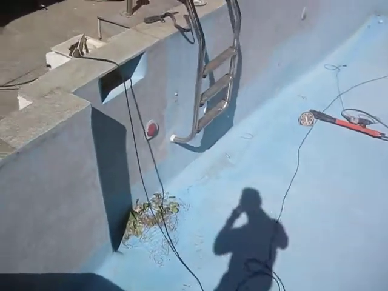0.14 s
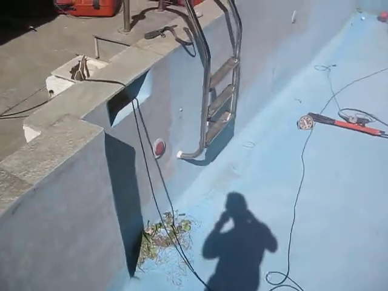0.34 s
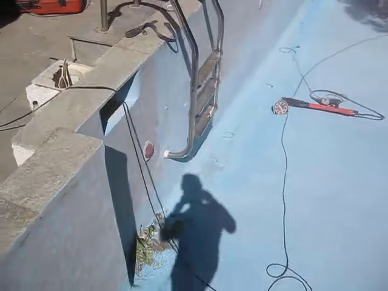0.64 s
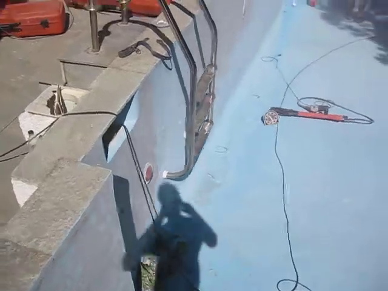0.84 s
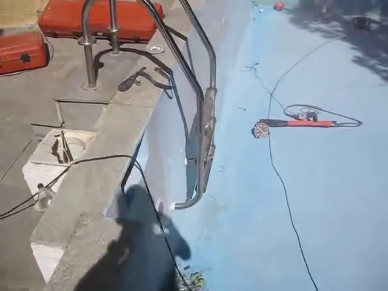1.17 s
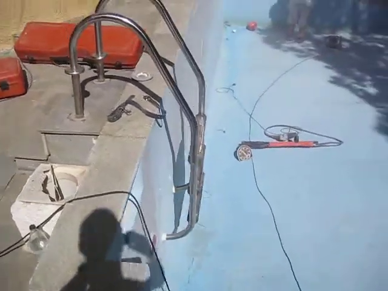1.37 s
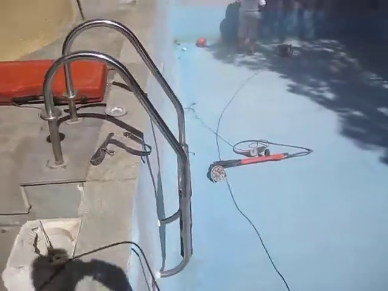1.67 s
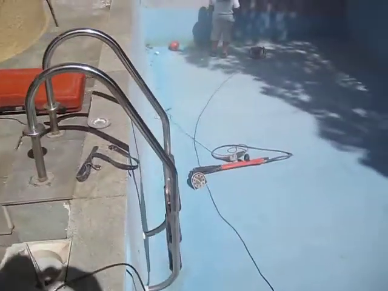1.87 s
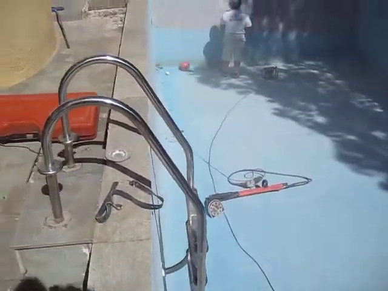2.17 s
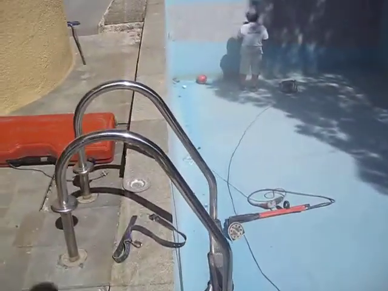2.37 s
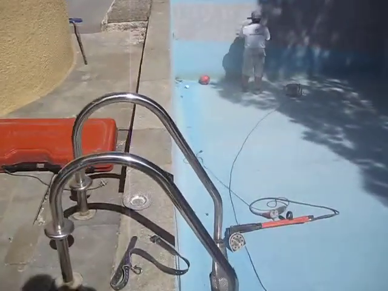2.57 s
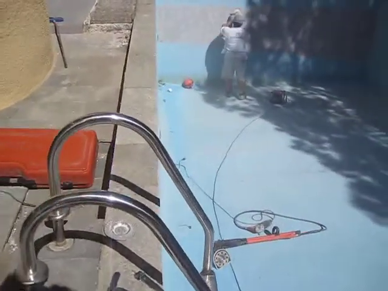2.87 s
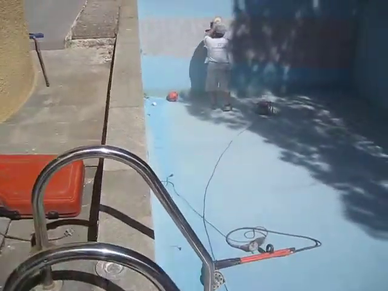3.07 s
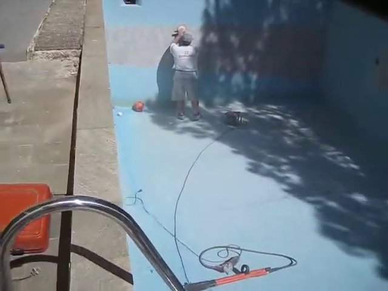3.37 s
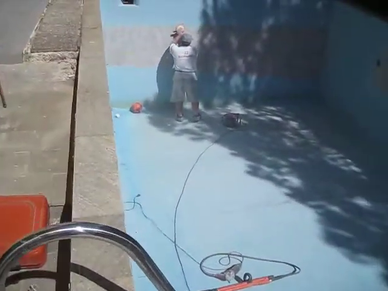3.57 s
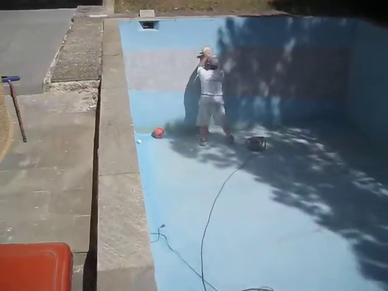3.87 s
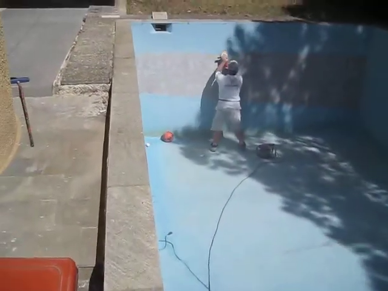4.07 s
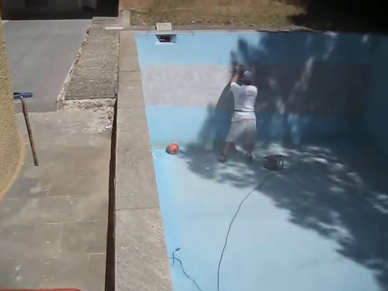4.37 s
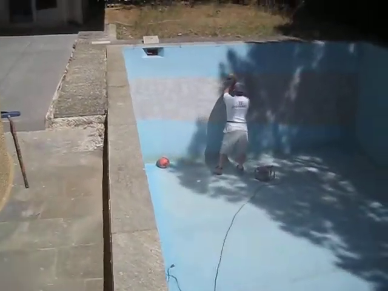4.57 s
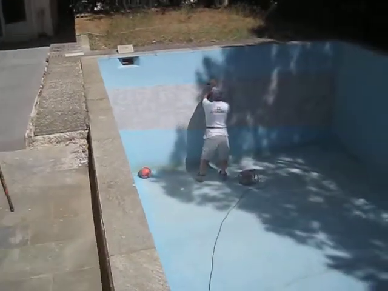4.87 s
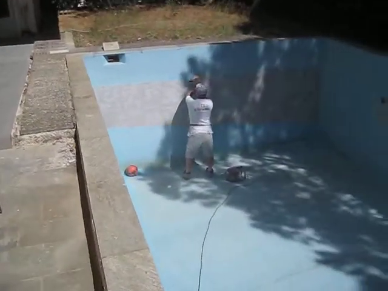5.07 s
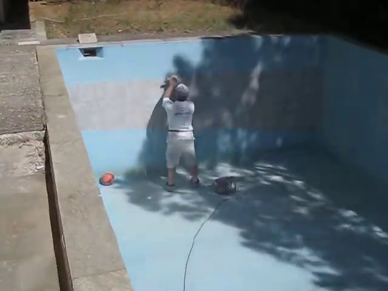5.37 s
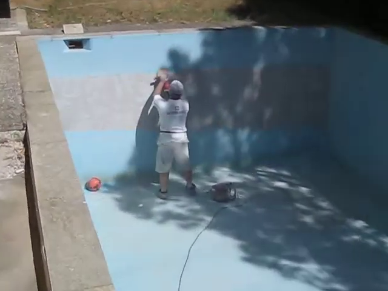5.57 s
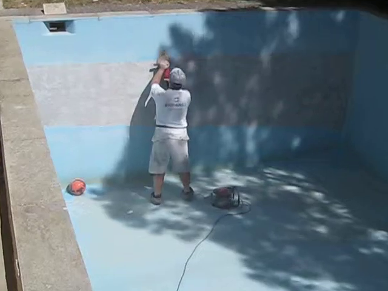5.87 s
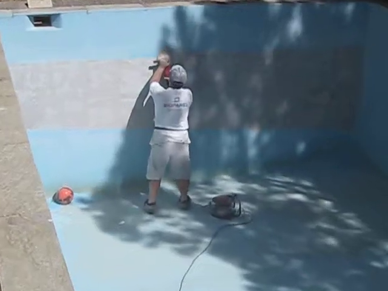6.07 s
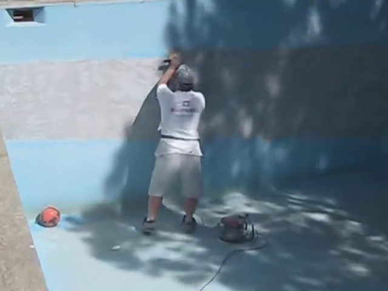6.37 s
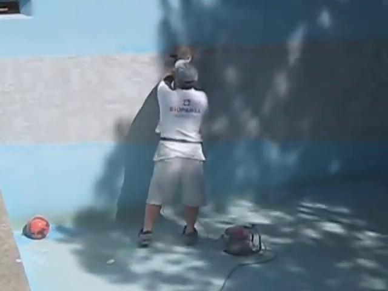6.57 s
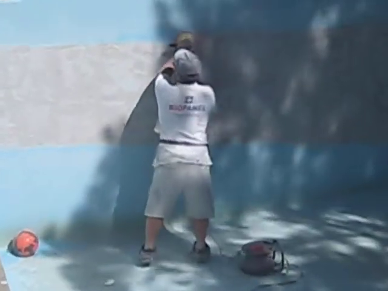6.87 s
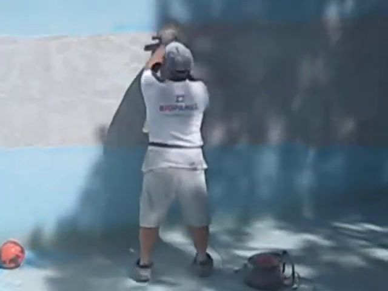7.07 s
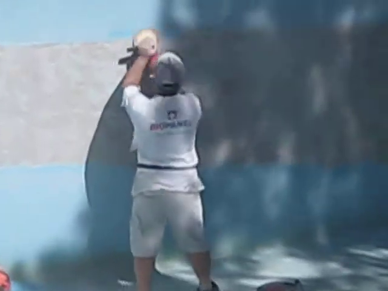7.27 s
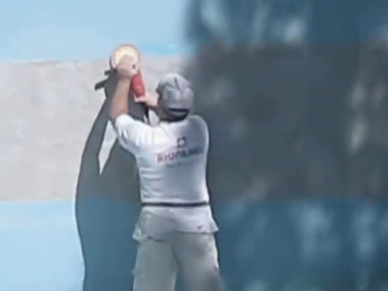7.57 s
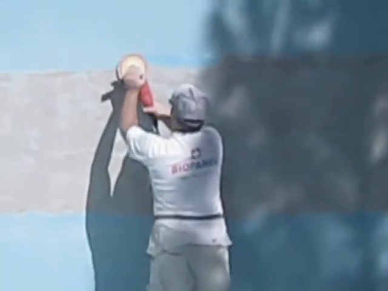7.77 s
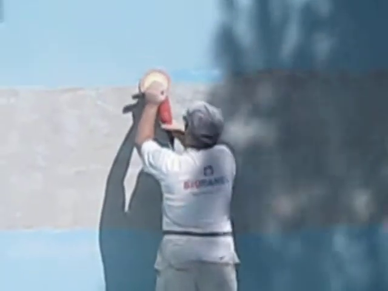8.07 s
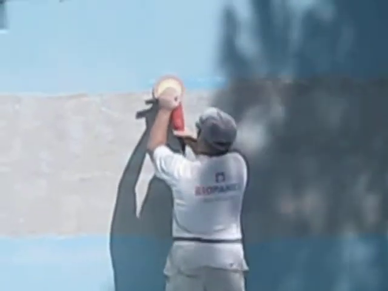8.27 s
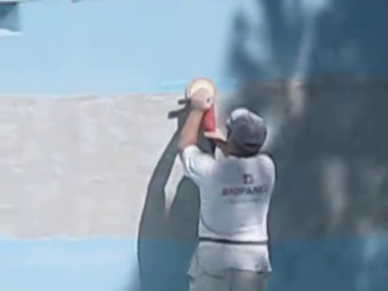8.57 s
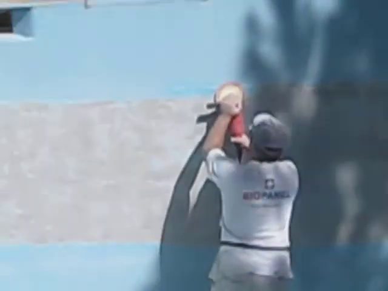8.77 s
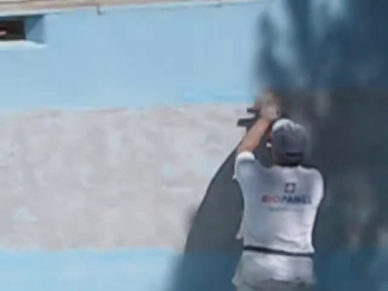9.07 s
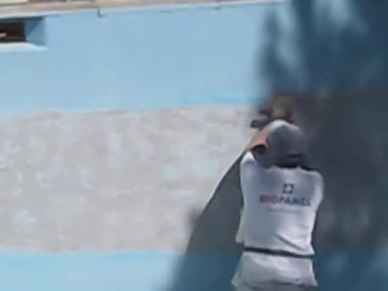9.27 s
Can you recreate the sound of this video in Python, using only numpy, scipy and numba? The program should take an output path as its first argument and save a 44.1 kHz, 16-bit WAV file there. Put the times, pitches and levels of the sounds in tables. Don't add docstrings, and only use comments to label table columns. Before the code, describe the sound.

Wind thumps and flutters on a small microphone at a pool's rim. At a distance, an electric grinder chatters about seventeen times a second, each touch ringing the disc, as its whine slides downward. Then the disc bites in a few cracks and gritty snaps, revs up and labours continuously on concrete: rough hiss, per-turn throb, metallic ring and a whine that bends with pressure. A slight wall echo follows; it ends still grinding.

```python
import sys
import numpy as np
from scipy import signal
from scipy.fft import rfft, irfft, next_fast_len
from scipy.io import wavfile
from numba import njit

SR = 44100
rng = np.random.default_rng(int(sys.argv[2]) if len(sys.argv) > 2 else 0)


def wav_out(sig):
    wavfile.write(sys.argv[1], SR, np.round(np.clip(np.atleast_2d(sig).T, -1, 1) * 32767).astype(np.int16))


def ratio_of_db(decibels):
    return 10 ** (np.asarray(decibels, float) / 20)


N = 415422
PRESSED_S = 3.294


def rms_one(x):
    return x / np.sqrt(np.mean(x ** 2) + 1e-20)


def in_time(rows):
    s, *columns = np.transpose(rows)
    return [np.interp(np.arange(N) / SR, s, c) for c in columns]


def colour(x, spectrum):
    hz, db = np.transpose(spectrum)
    size = next_fast_len(N)
    bins_hz = np.fft.rfftfreq(size, 1 / SR)
    gain = ratio_of_db(np.interp(np.log(bins_hz + 1), np.log(hz), db, left=-80, right=-80))
    return irfft(rfft(x, size) * rms_one(gain), size)[:N]


def drift(rate_hz):
    r = np.exp(-2 * np.pi * rate_hz / SR)
    slow = signal.lfilter([1], [1, -2 * r, r * r], rng.standard_normal(N + SR))
    return rms_one(slow[SR:])


@njit
def glide(x, cosine, r):
    y = np.zeros(len(x))
    for i in range(2, len(x)):
        y[i] = x[i] - x[i - 2] + 2 * r * cosine[i] * y[i - 1] - r * r * y[i - 2]
    return y


def resonance(x, hz, width_hz):
    r = np.exp(-np.pi * width_hz / SR)
    return (1 - r * r) / 2 * glide(x, np.cos(2 * np.pi * hz / SR) * np.ones(N), r)


def gritty(spread_db):
    return rms_one(rng.standard_normal(N) * ratio_of_db(spread_db * drift(800)))


def add(track, s, piece):
    i = max(round(s * SR), 0)
    track[i:i + len(piece)] += piece[:N - i]


# time in seconds, level in dB.
GUSTS = [(0, -40.5), (.6, -46.5), (1.3, -41.5), (1.6, -46), (2.0, -40.5), (2.6, -37), (3.1, -38),
         (3.5, -44), (4.2, -44.5), (4.5, -38), (5.3, -39), (5.85, -42), (6.1, -48.5), (6.8, -38),
         (7.2, -42), (7.9, -46.5), (8.5, -52.5), (9.42, -45)]
# time in seconds, peak in dB, width in ms.
POPS = [(0.018, -21.5, 2.1), (0.157, -21.5, 1.5), (0.3483, -23, 2), (0.387, -19.5, 1.3),
        (0.5187, -13.5, 1.4), (0.6094, -22, 1.9), (0.6988, -17.5, 1.1), (0.766, -20, 1.8),
        (1.032, -12, 1.2), (1.055, -16, 1.6), (1.3414, -21, 1.6), (1.907, -10.5, 1.3),
        (2.1001, -12.5, 1.57), (2.178, -21, 1.7), (2.33, -22, 1.3), (2.4178, -9.5, 1), (2.452, -18, 1.6),
        (2.6568, -21, 1.5), (2.7134, -22, 1.2), (2.8351, -11, 2), (2.899, -8, 0.86), (2.9166, -15, 1.1),
        (2.9598, -10.5, 1.2), (3.007, -15, 0.66), (3.06, -8, 0.88), (3.092, -14, 3.6), (3.126, -9.5, 1.1),
        (3.327, -16, 1.5), (3.3568, -7, 1.05), (3.466, -20, 1.9)]
# time in seconds, peak in dB, width in ms.
LATE_POPS = [(3.7404, -12.5, 0.5), (3.7513, -7, 0.42), (3.827, -9.5, 0.51), (3.9633, -17, 0.62),
             (4.0101, -18.5, 0.98), (4.443, -12.5, 1.5), (4.466, -14.5, 0.67), (4.66, -10, 0.53),
             (4.7979, -14, 1.05), (4.9396, -15, 1), (5.0975, -14.5, 0.89), (5.322, -16.5, 1),
             (5.345, -7.5, 0.84), (5.458, -18, 0.62), (5.503, -17, 1.4), (5.5552, -11, 1),
             (5.592, -12, 0.69), (6.244, -12.5, 1.1), (6.485, -21, 0.93), (6.6999, -10, 0.58),
             (6.73, -16, 1), (6.808, -10, 0.47), (6.9498, -5.5, 0.74), (6.985, -10, 1.15),
             (7.0342, -12, 0.9), (7.113, -7, 0.48), (7.2419, -17.5, 0.67), (7.4082, -25, 0.98),
             (8.0584, -19.5, 1.6), (8.663, -26, 1.7)]
# time in seconds, peak in dB.
SMALL_POPS = [(2.112, -16), (2.753, -22), (2.8202, -20), (2.882, -32), (2.9274, -25), (3.026, -16),
              (3.072, -20), (3.6874, -19.5), (3.76, -25), (4.4222, -24), (4.6753, -23), (5.387, -21),
              (5.3977, -21), (5.513, -21), (5.5662, -15), (5.616, -15), (6.281, -22), (6.6244, -21),
              (6.675, -20), (6.7703, -21), (6.824, -15), (6.9076, -19), (7.001, -15.5), (7.072, -17),
              (7.136, -19), (7.162, -18), (7.2613, -15.5), (7.723, -27), (8.225, -29), (9.16, -32)]
# time in seconds, peak in dB, width in ms.
DULL_POPS = [(0.048, -27, 1.4), (0.189, -21, 1.6), (0.209, -25, 1.6), (0.311, -31, 1.8), (0.409, -25, 1.6),
             (0.749, -23, 1.8), (0.847, -28, 2.3), (0.92, -30, 2), (0.969, -30, 1.6), (1.068, -36, 1.6),
             (1.169, -46, 1.8), (1.29, -30, 1.4), (1.325, -29, 1.3), (2.581, -22, 2.9), (4.16, -28, 2.3),
             (7.121, -23, 1.3), (7.18, -24, 1.6), (7.289, -30, 1.2), (7.339, -26.5, 1.4), (7.388, -26, 1.6),
             (7.704, -33, 1.6), (7.739, -37, 2), (7.789, -50, 1.6), (7.849, -37, 1.6), (7.916, -38, 1.2),
             (7.969, -33, 1.2), (8.04, -34, 1.9), (8.249, -34, 2.5)]
# frequency in Hz, level in dB per Hz.
WIND = [(15, -14), (40, -0.5), (100, -3.5), (200, -8), (350, -13), (600, -21.5)]
# frequency in Hz, level in dB per Hz.
FLUTTER = [(40, -6), (150, 4), (350, 1), (700, -10.5), (1400, -17)]
SMALL_POP_MS = 0.85
TRAIL_S, TRAIL_LOSS_DB = 0.014, 15.5
HEAVE_S, HEAVE_DB = 0.2, -35
STRAY_PER_S, STRAY_DB = 3.0, 7


def wind():
    gust_db, = in_time(GUSTS)
    eddies = POPS + LATE_POPS
    trails = []
    for (s, db, width_ms), pair in zip(eddies, rng.random((len(eddies), 2, 2))):
        for k, (late, weak) in enumerate(pair, start=1):
            delay = TRAIL_S * k * (0.55 + 0.795 * late)
            trails.append((s + delay, db - TRAIL_LOSS_DB * k * (0.5 + weak), width_ms))
    strays = []
    for s in np.cumsum(rng.exponential(1, 80)) / STRAY_PER_S:
        if 0.02 < s < N / SR - 0.05:
            strays.append((s, gust_db[int(s * SR)] + STRAY_DB, 1.5))
    small = [(s, db, SMALL_POP_MS) for s, db in SMALL_POPS]

    heave, flurry, pops = np.zeros((3, N))
    for s, db, width_ms in eddies:
        add(heave, s - HEAVE_S / 2, ratio_of_db(db + HEAVE_DB) * np.hanning(round(HEAVE_S * SR)))
    pushes = np.where(rng.random(300) < 0.92, 1, -1)
    for (s, db, width_ms), push in zip(eddies + small + trails + strays + DULL_POPS, pushes):
        t = np.arange(-0.006, 0.006, 1 / SR) / (width_ms * 0.00064)
        add(pops, s - 0.006, push * ratio_of_db(db) * (1 - 0.74 * t ** 2) * np.exp(-0.45 * t ** 2))
        add(flurry, s - 0.012, ratio_of_db(db) * np.hanning(round(0.019 * SR)))
    swell = (ratio_of_db(gust_db - 3.5) + heave) * ratio_of_db(4 * drift(25))
    rumble = colour(swell * rng.standard_normal(N), WIND)
    flutter = ratio_of_db(-14) * colour(flurry * rng.standard_normal(N), FLUTTER)
    return rumble + pops + flutter


# time in seconds, peak in dB, low ring in dB, middle ring in dB, bright ring in dB.
SKIPS = [(0.002, -26, -37, -28, -34), (0.0364, -24.5, -32, -19.5, -37), (0.094, -22.5, -36, -24, -33),
         (0.1824, -22, -20, -26, -40), (0.2434, -20.5, -27.5, -22.5, -32), (0.306, -19.5, -31, -24, -38),
         (0.3744, -18.5, -30, -31, -33), (0.443, -18, -25, -31, -34), (0.5062, -17.5, -22.5, -50, -33),
         (0.5621, -18.5, -23, -30, -33), (0.625, -17.5, -24.5, -28, -33), (0.6759, -24, -27, -30, -31),
         (0.7158, -25, -25, -22, -35), (0.7632, -18.5, -23, -32, -30), (0.8051, -22, -25, -26, -32.5),
         (0.854, -21.5, -35, -28, -45), (0.9094, -24, -28, -29, -41), (0.9697, -20, -24.5, -27, -42),
         (1.014, -23, -26, -28, -35), (1.0794, -30, -25, -24, -36), (1.161, -28, -31, -24, -31),
         (1.2244, -26, -32, -36, -34), (1.3089, -20, -23, -36, -36), (1.3399, -22, -27, -40, -33.5),
         (1.3904, -23, -35, -34, -32), (1.4396, -22.5, -29, -29.5, -31), (1.493, -24, -28, -31, -31),
         (1.5454, -23, -25, -27, -35), (1.572, -26, -28, -34, -34), (1.6322, -32, -29, -25.5, -35),
         (1.724, -33, -28, -22, -34)]
# time in seconds, then four levels in dB.
SLOW_SKIPS = [(1.7838, -24, -38, -35, -37), (1.833, -35.5, -32, -17.5, -36), (1.875, -34, -29, -32, -35),
              (1.9214, -38, -26, -19, -36), (1.9667, -32, -25, -28, -35), (2.0194, -26, -28, -43, -36),
              (2.0824, -25, -26, -32, -40), (2.1335, -27, -25.5, -37, -35.5), (2.201, -26, -25.5, -34, -32),
              (2.2333, -26, -24.5, -30, -37), (2.279, -21, -23, -41, -35), (2.3246, -27, -34, -42, -38),
              (2.374, -28, -24, -32, -35), (2.4415, -29, -28, -27, -34), (2.476, -21, -27, -35, -37),
              (2.536, -22.5, -29, -36, -37), (2.601, -24, -30, -32, -32), (2.6553, -26, -24, -34, -33),
              (2.692, -29, -23, -25, -38), (2.758, -23.5, -25.5, -29, -35.5), (2.813, -37, -27, -27, -34),
              (2.877, -24, -25, -34, -30), (2.931, -30, -29, -27, -34), (2.9572, -31, -28, -36, -37),
              (3.0106, -23, -29, -35, -35), (3.0626, -23, -29, -33, -36), (3.095, -29, -24.5, -28, -43),
              (3.1314, -30, -33, -28, -39), (3.19, -23.5, -26, -41, -33), (3.236, -30, -35, -25, -38),
              (3.271, -27, -28, -28, -40)]
# time in seconds, upper whine in Hz, lower whine in Hz, upper level in dB, lower level in dB.
COAST = [
    (0, 5180, 1860, -44, -29),
    (.6, 4920, 1630, -51, -31),
    (1.2, 4520, 1580, -37.5, -28),
    (1.6, 4190, 1540, -35.5, -29),
    (2.0, 3900, 1360, -33.5, -31),
    (2.25, 3870, 1310, -40, -32.5),
    (2.6, 3920, 1190, -47, -36),
    (3.28, 3900, 1010, -48, -37),
    (3.5, 3800, 960, -70, -70),
]
# frequency in Hz, width in Hz, level in dB.
DISC = [
    (2155, 620, -2),
    (3893, 190, -0.5),
    (4950, 560, 0),
    (4520, 350, -12),
    (6940, 84, -2),
    (8330, 1360, -1),
]
# frequency in Hz, level in dB per Hz.
SCRAPE = [(500, -42), (1200, -4), (2200, -7), (3200, 8), (4500, 12.5), (6000, 3), (8800, 5), (10500, -8),
          (15000, -14)]
# frequency in Hz, level in dB per Hz.
AIR = [(200, -23), (450, -2), (600, -1), (1500, 0), (3000, 0), (5000, -1), (6500, -10), (9500, -4.5),
       (11000, -3), (12000, -1), (13200, -14.5), (16000, -18)]
SKIP_S, SKIP_SHARE_OF_GAP, SKIP_SHORTENS_PER_S = 0.016, 0.28, 0.0026
MEAN_SKIP_DB, COLOUR_SWING = -16.5, 1.43
RING_SPREAD_DB = 1.5
TICK_S, TICK_SHARE, BOUNCE_S, BOUNCE_SHARE = 0.0023, 0.39, 0.016, 0.4
AIR_DB, AIR_LOADED_DB = -32.5, -46.5


def skipping():
    upper_hz, lower_hz, upper_db, lower_db = in_time(COAST)
    skips = np.array(SKIPS + SLOW_SKIPS)
    starts = skips[:, 0]
    gaps = np.diff(starts, append=PRESSED_S + 0.0096)
    lengths = SKIP_S + SKIP_SHARE_OF_GAP * gaps - SKIP_SHORTENS_PER_S * starts
    levels = MEAN_SKIP_DB + COLOUR_SWING * (skips[:, 1:] - skips[:, 1:].mean(axis=0))
    chance = rng.standard_normal((len(skips), len(DISC)))
    touch, strikes = np.zeros(N), np.zeros((len(DISC), N))
    for s, (db, low_db, middle_db, bright_db), length, luck in zip(starts, levels, lengths, chance):
        rise = max(0.013 - 0.0058 * s, 0.0004)
        t = np.arange(round(3.2 * length * SR)) / SR
        tick = s * TICK_SHARE * np.exp(-t / TICK_S)
        bounce = BOUNCE_SHARE * np.exp(-((t - BOUNCE_S) / 0.0022) ** 2)
        shape = (1 - np.exp(-t / rise)) * (np.exp(-(t / length) ** 1.37) + tick + bounce)
        add(touch, s - 0.54 * rise, ratio_of_db((db + middle_db) / 2) * shape)
        rings_db = [low_db, middle_db, db, db, (db + bright_db) / 2, bright_db]
        for strike, (hz, width_hz, mode_db), own, ring_db in zip(strikes, DISC, luck, rings_db):
            add(strike, s - 0.78 * rise, shape * ratio_of_db(mode_db + ring_db - 5.5 + RING_SPREAD_DB * own))

    scrape = ratio_of_db(-16.5) * colour(touch * gritty(0.95), SCRAPE)
    noise = gritty(2.5)
    rung = np.zeros(N)
    for strike, (hz, width_hz, _) in zip(strikes, DISC):
        rung += ratio_of_db(2.5) * resonance(resonance(strike * noise, hz, width_hz), hz, 2 * width_hz)
    shaken = (0.028 + touch) / 0.12 * gritty(1.1)
    upper = ratio_of_db(upper_db + 24.5) * resonance(shaken, upper_hz * (1 + 0.0036 * drift(29)), 96)
    lower = ratio_of_db(lower_db + 11.5) * resonance(shaken + 0.53 * gritty(1.6), lower_hz, 224)
    air_db = np.interp(np.arange(N) / SR, [PRESSED_S, PRESSED_S + 0.13], [AIR_DB, AIR_LOADED_DB])
    air = ratio_of_db(air_db + drift(41)) * colour(rng.standard_normal(N), AIR)
    return scrape + rung + upper + lower + air


# time in seconds, peak in dB, 60 dB decay in seconds.
BITES = [
    (3.294, -11, 0.07),
    (3.332, -12, 0.037),
    (3.535, -19, 0.21),
    (3.561, -22, 0.049),
    (3.589, -19, 0.044),
]
# time in seconds, peak in dB.
SNAGS = [
    (3.5344, -11),
    (3.547, -10),
    (3.5578, -4),
    (3.5724, -11),
    (3.5893, -6),
    (3.6004, -9),
]
# frequency in Hz, level in dB per Hz.
GRIND = [(1500, -63), (1900, -7), (2400, -1), (3200, -1), (4000, 4), (5500, 3), (7000, -3.5)]
# frequency in Hz, level in dB per Hz.
GRIT = [(5000, -16), (7000, -6.5), (9000, -7), (10500, -6.5), (12000, -11.5), (13500, -17.5),
        (16000, -18.5)]


def bites():
    blows = np.zeros(N)
    for s, db, t60 in BITES:
        t = np.arange(round(t60 * SR)) / SR
        add(blows, s, ratio_of_db(db - 60 * t / t60))
    blows *= 0.51 * rng.standard_normal(N)
    for s, db, t60 in BITES:
        add(blows, s, ratio_of_db([db + 8]))
    snaps = np.zeros(N)
    for s, db in SNAGS:
        add(snaps, s, ratio_of_db(db - 300 * np.arange(0, 0.003, 1 / SR) / 0.06))
    snaps *= rng.standard_normal(N)

    crack = ratio_of_db(-6) * colour(blows, GRIT) + ratio_of_db(-3) * colour(blows, GRIND)
    snapping = ratio_of_db(-7.5) * (colour(snaps, GRIND) + 0.44 * colour(snaps, GRIT))
    guard_modes = [(945, 3), (1240, 4), (1540, 4.5), (2150, 3), (2580, -2)]   # Hz, dB
    guard = sum(ratio_of_db(db + 15) * resonance(blows, hz, 44) for hz, db in guard_modes)
    return crack + snapping + guard


def worn_face(turns, rate_hz):
    faces = irfft(np.exp(2j * np.pi * rng.random((4, 161))), 2048, axis=1)
    at = (turns % 1 * 2048).astype(int)
    wear = np.array([drift(rate_hz) for face in faces])
    return rms_one(np.sum(wear * faces[:, at], axis=0) / np.sqrt(np.sum(wear ** 2, axis=0)))


# time in seconds, speed in turns per second.
SPEED = [(3.3, 44), (3.75, 70), (4.02, 92.5), (4.9, 97), (5.3, 93), (5.65, 97.5), (5.85, 95), (6.2, 85.5),
         (6.48, 82.3), (6.75, 91.5), (7.05, 94.3), (7.3, 91.8), (7.73, 96.4), (7.92, 83), (8.27, 77.6),
         (8.95, 78.6), (9.2, 83.5), (9.42, 92.5)]
# time in seconds, rim pressure in dB, flat contact in dB, throb per turn from 0 to 1.
PRESS = [(3.294, -24.5, -28, 0.2), (3.45, -21.5, -32, 0.44), (3.75, -21.5, -33, 0.2),
         (4.05, -22.5, -33, 0.3), (4.3, -20.5, -53, 0.27), (4.55, -23, -55, 0.1), (4.69, -26.5, -30.5, 0.2),
         (4.91, -24.5, -32, 0), (5.15, -22, -31.5, 0), (5.6, -22.5, -28, 0), (6.2, -23.5, -31, 0),
         (6.45, -22, -25.5, .2), (6.89, -24, -26.5, 0.2), (7.3, -22.5, -35, 0), (7.9, -23.5, -29.5, 0),
         (8.35, -23, -30.5, 0), (8.75, -24.5, -29.5, 0), (9.42, -22.5, -27.5, 0.27)]
# time in seconds, ring in dB, ring in Hz, looseness from 0 to 2, hum of the wall in dB.
GRIP = [(3.294, -35, 1000, 1.5, -45), (3.5, -33, 1035, 1.1, -37), (3.65, -51, 1060, 1.8, -35),
        (4.1, -40.5, 1040, 1.7, -41.5), (4.32, -36, 960, 1.4, -37.5), (4.52, -39, 1030, 1.6, -39.5),
        (4.68, -29.5, 1035, 1.2, -36), (4.92, -35, 1060, 0.21, -36), (5.15, -46.5, 1040, 0.74, -41),
        (5.75, -39, 1130, 0.85, -42.5), (6.15, -37.5, 1150, 0.28, -37), (6.75, -34, 1112, 0.35, -37),
        (7.3, -41, 1095, 0.6, -38), (7.9, -43, 1140, 1.1, -44.5), (8.2, -40, 1150, 0.23, -42.5),
        (8.38, -34, 1137, 0.086, -41.5), (8.85, -39.5, 1185, 0.22, -38.5), (9.42, -34, 1126, 0.61, -35)]
# time in seconds, level in dB, centre of the whine in Hz.
MESH = [(3.3, -59, 1650), (3.7, -29, 2370), (4.0, -22.5, 3460), (4.6, -23.5, 3550), (4.85, -26.5, 3610),
        (5.3, -26, 3420), (5.65, -25, 3640), (6.0, -28, 3420), (6.5, -27.5, 2950), (6.9, -27.5, 3600),
        (7.3, -26, 3380), (7.7, -27.5, 3620), (7.9, -29.5, 3130), (8.1, -28, 2960), (8.6, -27, 2760),
        (9.05, -28, 2860), (9.42, -21.5, 3400)]
# time in seconds, level in dB.
SHED = [(3.3, 2), (3.6, 0), (4.1, 0), (4.5, 0), (4.8, 0), (5.2, -0.2), (5.8, -1), (6.3, 0), (6.7, -1.3),
        (7.1, -0.3), (7.7, 1.4), (8.3, 0.4), (9.0, 0), (9.42, -4)]
# time in seconds, peak in dB.
SPARKS = [(3.6388, -16), (3.7046, -18), (3.7356, -17), (4.0249, -23), (4.0364, -19), (4.0583, -17),
          (4.0698, -16), (4.1147, -19), (4.1362, -22), (4.1816, -20), (4.2015, -20), (4.202, -17),
          (4.224, -12), (4.3367, -15), (4.3532, -18), (4.3801, -20), (4.4011, -15), (4.414, -11),
          (4.4415, -19), (4.4624, -10), (4.4819, -19), (4.7039, -21), (4.7039, -18), (4.7143, -19),
          (4.7343, -11), (4.7792, -15), (4.7887, -14), (4.7982, -18), (4.8096, -16), (4.82, -10),
          (4.861, -21), (4.8919, -21), (4.9034, -12), (4.9643, -12), (5.0266, -18), (5.0476, -12),
          (5.0665, -11), (5.4177, -11), (5.6667, -20), (5.6871, -19), (5.8637, -18), (7.0316, -21),
          (7.0316, -12), (7.1483, -20), (7.1603, -10), (7.1917, -21), (7.2246, -18), (7.2685, -18),
          (7.3015, -13), (7.3663, -15), (8.0079, -16), (8.0443, -18), (8.1485, -19), (8.3117, -17),
          (8.3371, -14), (8.9028, -14), (9.0295, -17), (9.0799, -19), (9.0924, -10), (9.3463, -18)]
# frequency in Hz, level in dB per Hz.
WALL = [(430, -15), (520, 3.5), (700, 3), (900, 2), (1350, 5), (1800, 2.5), (2300, 3)]
# frequency in Hz, width in Hz, level in dB.
LOADED = [
    (2280, 540, -2.5),
    (2530, 170, 2.5),
    (3015, 360, -0.5),
    (4500, 230, -1.5),
    (5140, 200, -7.5),
]
GRIT_DB, GRIT_LATE_DB, BED_IN_S = -27.5, -10, 0.052
SPARK_S, SPARK_DB = 0.00086, -7


def grinding():
    speed, = in_time(SPEED)
    grind_db, disc_db, throb = in_time(PRESS)
    guard_db, guard_hz, loose, wall_db = in_time(GRIP)
    gear_db, gear_hz = in_time(MESH)
    shed_db, = in_time(SHED)
    since_pressed = np.arange(N) / SR - PRESSED_S
    turns = np.cumsum(speed * (1 + 0.0012 * drift(6))) / SR
    throb = np.clip(throb, 0, 1)
    high_spot = np.exp(1.7 * (np.cos(2 * np.pi * turns) - 1))
    high_spot = rms_one(high_spot * ratio_of_db(np.cos(np.pi * turns) + 1.2 * drift(37)))

    body_throb = 1 - 1.14 * throb + 0.53 * throb * high_spot
    body = colour(gritty(1) * body_throb, GRIND) * ratio_of_db(1.6 * drift(10.7) - 3.5)
    body += 0.45 * colour(worn_face(turns, 4), GRIND)

    grit_db = GRIT_DB + shed_db + GRIT_LATE_DB * np.exp(-np.abs(since_pressed) / BED_IN_S)
    grit = colour(gritty(2.1) * (1 - throb + throb * high_spot), GRIT) * ratio_of_db(grit_db + 1.16 * drift(11))
    sparks = np.zeros(N)
    t = np.arange(0, 6 * SPARK_S, 1 / SR) / SPARK_S
    for s, db in SPARKS:
        add(sparks, s - SPARK_S, ratio_of_db(db + SPARK_DB) * np.e * t * np.exp(-t))
    grit += colour(sparks * gritty(1), GRIT)

    knocks = rms_one(np.diff(np.floor(turns), prepend=0) * ratio_of_db(1.5 * drift(8)))
    face = 0.67 * worn_face(turns, 3)
    rattle = 0.9 * knocks + 0.3 * face + 1.15 * loose * rng.standard_normal(N)
    rattle /= np.sqrt(1 + loose ** 2)
    guard = resonance(rattle, guard_hz * (1 + 0.04 * loose * drift(8)), 140)
    guard = rms_one(resonance(resonance(guard, guard_hz, 260), 1.04 * guard_hz, 300))

    wall = colour(0.6 * face + gritty(2), WALL) * ratio_of_db(wall_db + 1.2 * drift(3.7))

    rubbing = 0.3 * knocks + 0.8 * face + gritty(1.6)
    disc = np.zeros(N)
    for hz, width_hz, db in LOADED:
        disc += ratio_of_db(db + 1.6 * drift(12)) * resonance(rubbing, hz * (1 + 0.015 * drift(3)), width_hz)
    disc = rms_one(disc)

    slack = 0.018 + 0.0012 * np.clip(94 - speed, 0, 16)
    mesh = 0.5 * knocks + (0.8 * face + 0.85 * gritty(2.8)) * (1 - 0.45 * throb + 0.45 * throb * high_spot)
    gear = resonance(mesh, gear_hz * (1 + slack * drift(30)), 420)
    gear = rms_one(resonance(gear, gear_hz, 1000))

    rings = ratio_of_db(guard_db - 0.8 + 1.2 * drift(10)) * guard
    rings += ratio_of_db(gear_db - 1.5 + 1.3 * drift(25)) * gear
    rings += ratio_of_db(disc_db) * disc
    pressed = np.clip(since_pressed / 0.00091, 0, 1)
    return pressed * (ratio_of_db(grind_db) * body + grit + wall + rings)


def scene():
    tool = skipping() + bites() + grinding()
    add(tool, 0.0431, ratio_of_db(-18) * tool.copy())
    return (wind() + tool)[None]


def low_pass(x):
    return signal.sosfilt(signal.butter(12, 15740, fs=SR, output="sos"), x)


DEAD_HZ, DEAD_WIDTH_HZ, TOP_HZ = 7880, 1980, 15740


def record(dry):
    r, cosine = np.exp(-np.pi * DEAD_WIDTH_HZ / SR), np.cos(2 * np.pi * DEAD_HZ / SR)
    zeros = (1 + r * r) / 2 * np.array([1, -2 * cosine, 1])
    poles = [1, -(1 + r * r) * cosine, r * r]
    notched = signal.lfilter(zeros, poles, dry)
    top_cut = signal.ellip(12, 0.5, 70, TOP_HZ, fs=SR, output="sos")
    mix = signal.sosfilt(top_cut, notched)
    return low_pass(mix)


dry = scene()
out = record(dry)
wav_out(out)
```